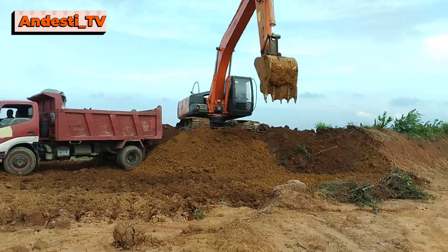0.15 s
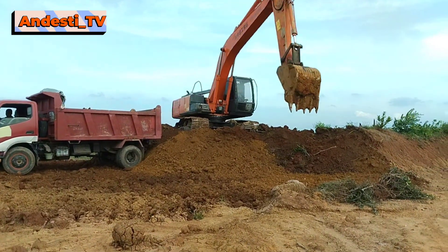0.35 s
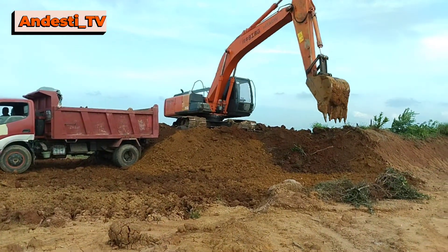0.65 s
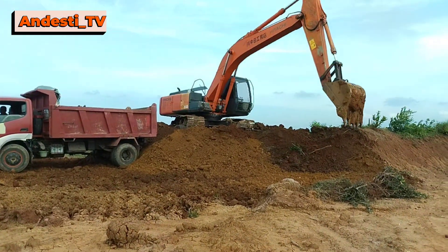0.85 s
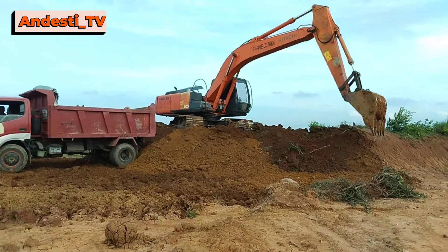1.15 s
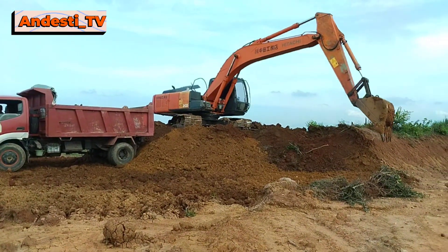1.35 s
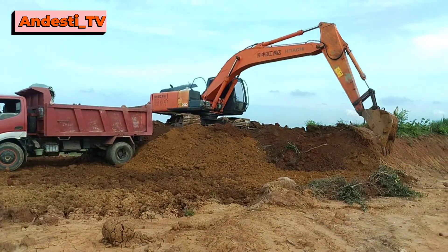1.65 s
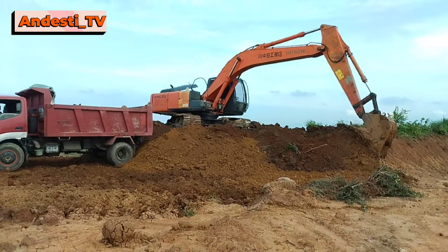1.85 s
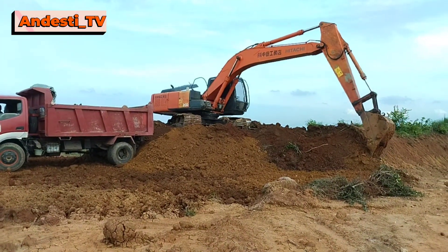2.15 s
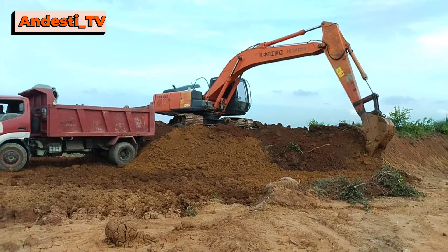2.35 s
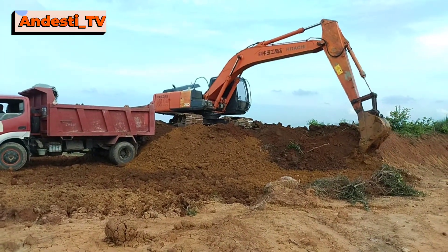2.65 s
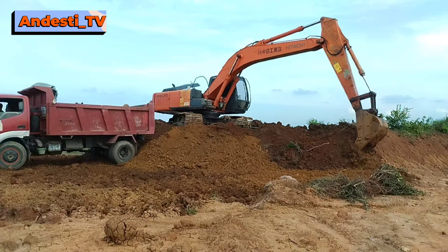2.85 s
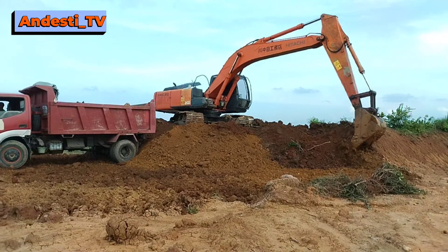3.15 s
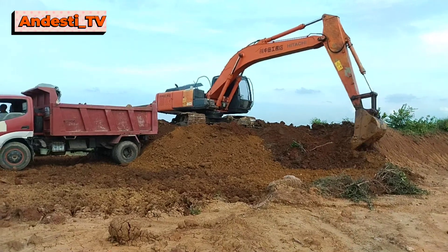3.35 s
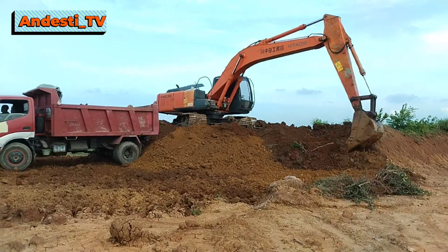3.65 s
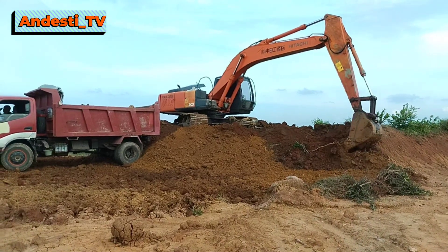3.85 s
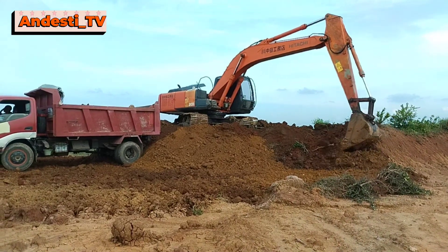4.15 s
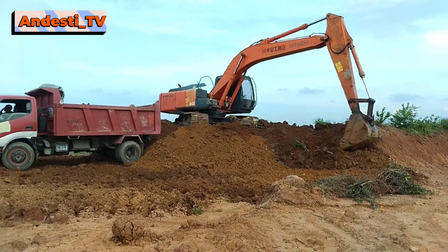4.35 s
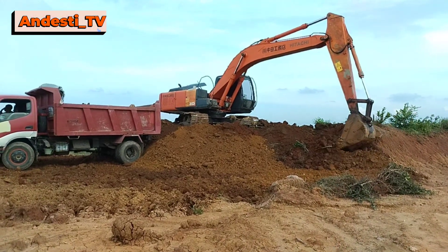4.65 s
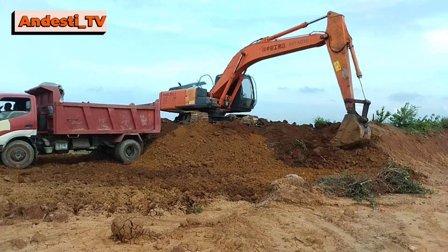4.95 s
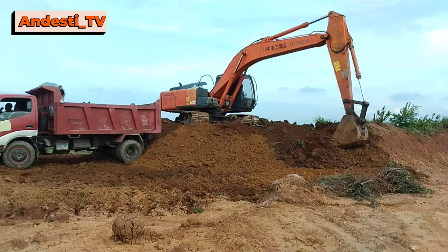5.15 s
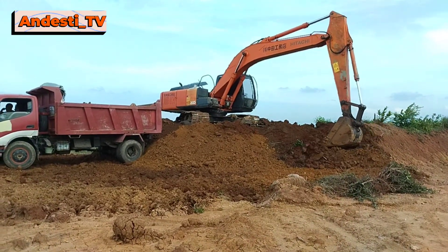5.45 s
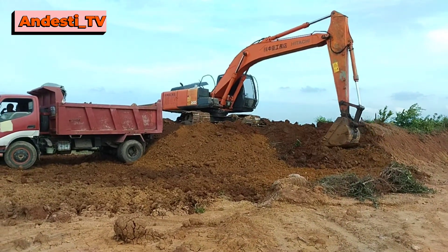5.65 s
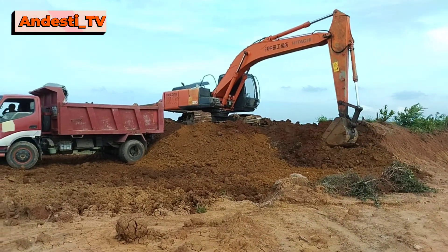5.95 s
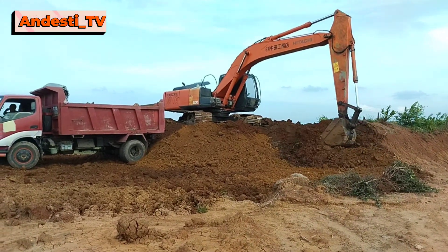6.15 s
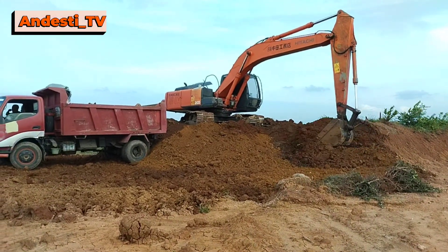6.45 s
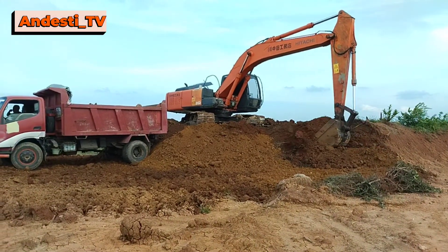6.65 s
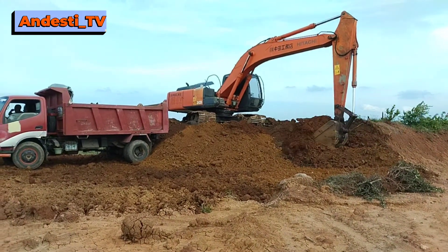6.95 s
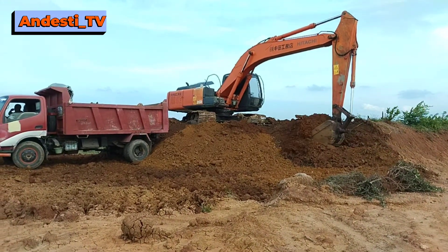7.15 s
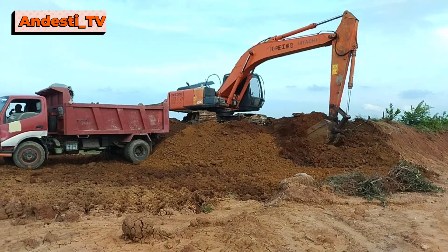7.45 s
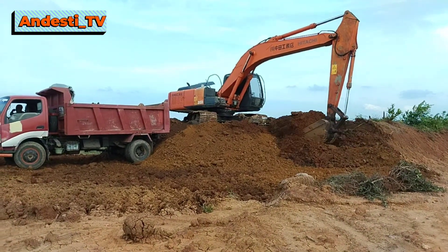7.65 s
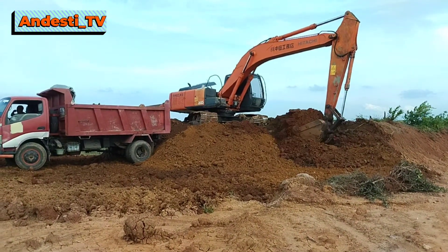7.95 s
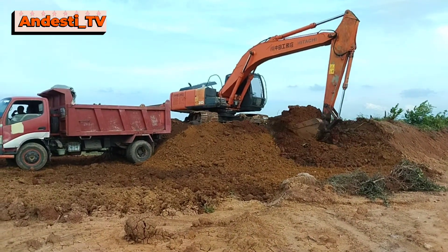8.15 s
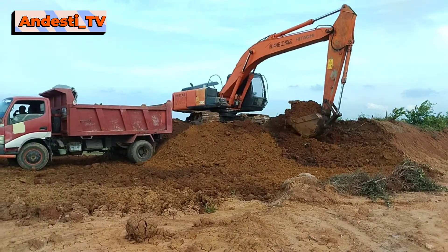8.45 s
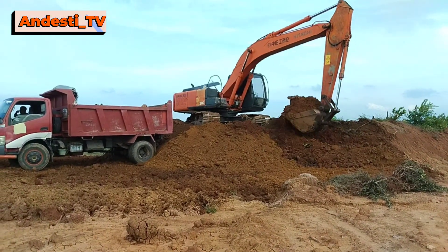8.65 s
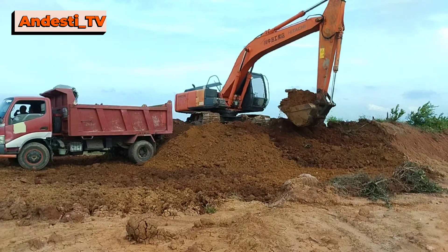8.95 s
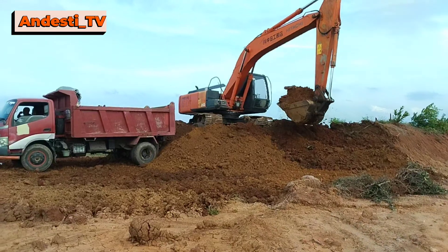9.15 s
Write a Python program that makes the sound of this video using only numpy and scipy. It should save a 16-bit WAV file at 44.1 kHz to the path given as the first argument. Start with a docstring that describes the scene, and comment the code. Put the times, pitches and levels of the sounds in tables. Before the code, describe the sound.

A diesel excavator works some way off in the open air beside an idling dump truck. Its exhaust hums and swells with the load under a thin, fluttering turbocharger whistle. Dry soil rustles and the steel arm creaks at first, then comes one sharp metallic scrape and a few small ticks. Faint soil rustles return later. Wind buffets the microphone in gusts, hardest in the first three seconds, over a constant low rumble.

```python
"""An earth bank in open air, some way from the microphone: a diesel excavator swings round and digs
beside an idling dump truck. Its exhaust hums and its turbocharger whistles with the load; soil rustles,
and there is one sharp metallic scrape and a few ticks. Gusts rise, hold and die away over a light
breeze, buffet the microphone and drive the recorder into its limiter."""
import sys
import numpy as np
from scipy import signal
from scipy.fft import rfft, irfft
from scipy.io import wavfile
from scipy.ndimage import uniform_filter1d, minimum_filter1d

SR = 44100
rng = np.random.default_rng(int(sys.argv[2]) if len(sys.argv) > 2 else 0)


def dump(signal):
    """Clip the signal to [-1, 1] and save it as 16-bit WAV at the path in sys.argv[1]."""
    limited = np.clip(np.atleast_2d(signal).T, -1, 1)
    pcm = np.round(limited * 32767).astype(np.int16)
    wavfile.write(sys.argv[1], SR, pcm)


N = 410571
TIME = np.arange(N) / SR

# gusts at the microphone: t/s, hold/s, level/dB
GUSTS = [(0, .05, -9.5), (.08, 0.056, -16.5), (.4, 0.14, -17), (.565, 0.18, -5.5), (.82, 0.084, -6.5),
         (.91, 0.054, -11.5), (1.01, 0.079, -3.5), (1.13, 0.11, -9), (1.26, 0.23, -6.5), (1.51, .16, -7),
         (1.72, .13, -8), (1.9, 0.37, -10), (2.3, .025, -9), (2.5, 0.077, -7.5), (2.63, 0.21, -8.5),
         (2.89, .065, -5), (3.465, 0.032, -8.5), (3.695, 0.022, -16.5), (3.975, 0.017, -13.5),
         (4.52, .05, -5), (4.64, .045, -5), (4.735, 0.021, -6.5), (4.98, 0.29, -12.5), (5.1, 0.072, -7),
         (5.415, 0.093, -9), (5.555, 0.013, -9.5), (5.685, 0.055, -9), (6.91, 0.014, -18.5),
         (7.255, .03, -12), (7.59, 0.016, -13.5), (7.815, 0.039, -11.5), (7.9, 0.15, -16.5),
         (8.22, 0.074, -11), (8.36, 0.043, -11.5), (8.485, .09, -11.5), (8.64, 0.093, -17.5),
         (8.95, .075, -15.5), (9.25, .06, -17.5)]
GUST_ATTACK_S, GUST_RELEASE_S = 0.024, 0.025


def exhaust(firings):
    """The excavator's pipe hums and swells with load, with a whine at ten times the firing rate."""
    # exhaust note under load: t/s, level/dB
    load = [(0, -27), (2.3, -22), (3.0, -20.5), (3.8, -17), (4.3, -25), (5.9, -25.5), (6.3, -29.5),
            (6.7, -25.5), (7.6, -25), (8.3, -40), (9.3, -28)]
    # lines of the hum: multiple of the firing rate, relative level/dB
    harmonics = [(1, -13.5), (2, -2.5), (3, -39), (4, -30), (6, -24.5), (8, -45), (17, -39)]
    hum = 0
    for k, db in harmonics:
        level = undb(db + 2 * walk(10))
        hum += level * np.sin(2 * np.pi * round(k) * firings + 0.12 * walk(13) + random_phase())
    whine = np.sin(2 * np.pi * 10 * firings) * undb(-31.5 + 2 * walk(7.7))
    hum_db, whine_share = curve(load), 0.44
    return hum * undb(hum_db) + whine * undb(whine_share * hum_db)


def engine_block(firings):
    """Combustion clatter swells at each firing over the steady rush of fan and intake."""
    # clatter of the block: f/Hz, spectral density/dB
    block_colour = [(150, 9.5), (260, -6), (380, -2), (640, -2.5), (870, 4), (1110, -15), (1260, -0.5),
                    (1480, 2), (1670, -5), (1860, 0.5), (2070, -10), (2600, -1), (3450, -13.5), (4200, -26)]
    # air rushing through the intake: f/Hz, spectral density/dB
    intake_colour = [(3000, -22), (4300, -8.5), (5500, -4.5), (6800, -3.5), (7600, 0.5), (8500, 2),
                     (9450, 3), (10100, -5.5), (12000, -7), (13500, -16), (15500, -19)]
    # block, fan and pumps together: t/s, gain/dB
    machine_gain = [(0, -3.5), (2.2, 1.5), (3.5, 0.5), (5.5, 0), (8.2, 0), (9.3, -1)]
    beat = 1 + 0.17 * np.cos(2 * np.pi * firings)
    clatter = unit(noise(block_colour) * beat) * undb(-35.5 + 0.91 * walk(25))
    intake = noise(intake_colour) * undb(-42.5 + 0.69 * walk(12))
    return (clatter + intake) * undb(curve(machine_gain))


def turbocharger():
    """The blade tone flutters, splitting into side lines that swell and fade inside a narrow hiss."""
    # pitch of the whistle: t/s, f/Hz
    pitch = [(0, 8190), (.55, 8210), (.95, 8230), (1.55, 8300), (2.0, 8050), (2.6, 7700), (3.0, 7940),
             (3.75, 8030), (5.0, 7900), (6.8, 7840), (7.3, 8000), (7.7, 7880), (8.4, 8040), (9.3, 8010)]
    # strength of the whistle: t/s, level/dB
    whistle_level = [(0, -39.5), (1.7, -42), (3.1, -36.5), (4.95, -37), (5.5, -40), (6.5, -38.5),
                     (6.7, -33.5), (7.3, -34.5), (7.7, -37), (8.1, -35), (8.7, -41.5), (9.3, -36)]
    flutter_hz = 73.7
    blade = 2 * np.pi * np.cumsum(curve(pitch) + 3.8 * walk(17)) / SR
    flutter = 2 * np.pi * np.cumsum(flutter_hz + 0.61 * walk(4.5)) / SR
    tone = 0
    for k in range(-4, 5):
        level = undb(-4.6 * abs(k - .1) + 2.2 * walk(3.9))
        tone += level * np.sin(blade + k * flutter + 0.46 * walk(25) + random_phase())
    hiss = walk(420) * np.sin(blade) + walk(420) * np.cos(blade)
    return even(tone + undb(-5.5) * hiss, 0.136) * undb(curve(whistle_level) + 2.23 * walk(24))


def digging():
    """Dry, grainy soil rustles in bursts, with a few rasping creaks that ring the steel arm."""
    # bursts of rustling: t/s, hold/s, level/dB
    bursts = [(.05, 0.69, -33.5), (.38, 0.12, -34), (.82, 0.082, -31.5), (.99, 0.063, -29),
              (1.15, 0.65, -44), (6.38, .08, -43), (7.98, 0.21, -39.5)]
    # dry soil: f/Hz, spectral density/dB
    soil_colour = [(500, 4), (850, 4), (1100, -2), (2100, -2.5), (2800, -2.5), (4000, -15.5), (6000, -11.5),
                   (9000, -3.5), (10500, -14), (11900, -12), (13200, -25), (15500, -19)]
    # creaks: t/s, level/dB, length/s, centre/Hz, width/Hz
    creaks = [(0.225, -32.5, 0.039, 1060, 1500), (0.395, -30.5, 0.067, 2100, 900),
              (0.795, -32.5, 0.11, 2650, 1090)]
    # modes of the arm: f/Hz, width/Hz, spectral density/dB
    arm_modes = [(829, 47, 0), (1600, 92, -8), (1836, 95, -5), (2200, 93, -6), (2680, 160, -9),
                 (3000, 120, -13)]
    grains = unit(noise(soil_colour) * undb(0.98 * walk(300) + 1.8 * walk(35)))
    out = grains * swells(bursts, attack=0.04, release=0.05)
    for s, db, length, hz, width_hz in creaks:
        size = int(length * SR)
        ring = unit(sum(undb(mode_db) * np.sqrt(width) * band(f, width, size)
                        for f, width, mode_db in arm_modes))
        rasp = band(hz, width_hz, size)
        out[int(s * SR):][:size] += undb(db) * np.sqrt(np.hanning(size)) * (rasp + ring)
    return out


def scrape():
    """Metal scrapes and snaps free: each slip is a burst of grit that rings it unevenly."""
    # slips: t/s, level/dB, attack/s, t60/s, centre/Hz, width/Hz, relative ring level/dB
    slips = [(2.325, -24, 0.0052, 0.17, 7440, 6000, 12), (2.328, -20.5, 0.0044, 0.42, 1050, 1340, -17),
             (2.331, -14.5, 0.004, 0.23, 2610, 1110, -12), (2.341, -13.5, 0.0027, 0.13, 8100, 3520, 0.5),
             (2.36, -2, 0.0018, 0.09, 6830, 1920, -12), (2.372, -13, 0.0026, 0.12, 6300, 2010, 0.5)]
    # modes of the scraped metal: f/Hz, level/dB, t60/s
    metal_modes = [(2897, -5.5, .11), (4746, -3.5, .085), (6230, -10, .12), (6570, -12, .12),
                   (7750, -4, .08), (8268, -4, .12), (9408, -8, .1), (11350, -16, .08)]
    out, t = np.zeros(N), TIME[:SR // 2]
    for s, db, attack, t60, hz, width_hz, ring_db in slips:
        ring = 0
        for f, mode_db, ring_t60 in metal_modes:
            phase = 2 * np.pi * f * t + random_phase()
            rubbing = .5 * band(190, 360, len(t))  # the contact keeps shaking the mode's phase
            ring += undb(mode_db) * fade(t, ring_t60) * np.sin(phase + rubbing)
        grit = band(hz, width_hz, len(t)) + undb(-19) * band(4000, 11000, len(t))
        slip = grit * fade(t, t60) + undb(ring_db) * ring
        out[int(s * SR):][:len(t)] += undb(db) * np.minimum(t / attack, 1) * slip
    return out


def ticks():
    """Small, bright ticks: bare bursts of noise that die quickly."""
    # ticks: t/s, level/dB, t60/s, centre/Hz, width/Hz
    bursts = [(.66, -30, .04, 4000, 5000), (.868, -27.5, 0.059, 7500, 6000), (1.766, -38, 0.12, 5500, 500),
              (3.229, -11.5, 0.0065, 8750, 4400), (3.445, -14.5, 0.0058, 8500, 4130),
              (5.215, -30, 0.069, 8860, 5980), (5.575, -31, .015, 11940, 3894),
              (7.125, -29, 0.085, 8800, 3450)]
    out, t = np.zeros(N), TIME[:SR // 2]
    for s, db, t60, hz, width_hz in bursts:
        out[int(s * SR):][:len(t)] += undb(db) * fade(t, t60) * band(hz, width_hz, len(t))
    return out


def truck():
    """Beside the excavator the idling truck ticks evenly, each tick with a lower diesel knock."""
    cycles = np.cumsum(23.2 + 0.2 * walk(1.84)) / SR
    pulse = uniform_filter1d(np.exp(-(cycles % 1) / 0.31), SR // 200) * undb(walk(23))
    return pulse * (undb(-43.5) * band(5960, 1130) + undb(-39.5) * band(2450, 1100))


def wind():
    """Eddies buffet the microphone over a deep rumble; stronger gusts bring smaller, brighter ones."""
    # rumble of the breeze: t/s, level/dB
    breeze_level = [(0, -18), (1.3, -25.5), (2.1, -18), (3.2, -22.5), (4.4, -26), (4.6, -16), (4.85, -17.5),
                    (5.75, -18.5), (6.1, -26.5), (6.6, -18.5), (6.85, -28), (8.2, -18), (9.3, -25)]
    # buffeting in a strong gust: f/Hz, spectral density/dB
    gust_colour = [(50, 1), (90, -0.5), (140, 2), (200, -2), (300, -11), (500, -17.5), (800, -32.5),
                   (1300, -74), (2500, -42)]
    # deep rumble: f/Hz, spectral density/dB
    rumble_colour = [(10, -3), (22, 2.5), (45, -3.5), (75, -3), (105, -9), (160, -31), (300, -41)]
    gusts, breeze = swells(GUSTS, GUST_ATTACK_S, GUST_RELEASE_S), undb(curve(breeze_level))
    buffet_db = 20 * np.log10(np.hypot(gusts, breeze * undb(-5.5 + 3.1 * walk(22))))
    brightness_db = np.minimum(buffet_db + 3.0, 0) + 2.1 * walk(70)
    centres = 60 * 2 ** np.arange(0, 5.5, .5)
    weights = undb(colour_db(gust_colour, centres)) * np.sqrt(centres)
    buffet = 0
    for hz, weight in zip(centres, weights):
        octaves_up = np.clip(np.log2(hz / 150), 0, 2.5)
        buffet += weight * band(hz, hz * 0.47) * undb(0.65 * octaves_up * brightness_db)
    surge = undb(-14) * uniform_filter1d(gusts ** 0.36, int(0.041 * SR))  # gusts swell the rumble too
    rumble = even(noise(rumble_colour), 0.156) * np.hypot(breeze, surge) * undb(2.26 * walk(20))
    return even(buffet, 0.0391) * undb(buffet_db + 2.43 * walk(60)) + rumble


def wind_slaps():
    """A lone eddy hits the microphone port with a quick, dull puff; smaller ones pepper the gusts."""
    # the hardest slaps: t/s, relative peak/dB
    slaps = [(0.576, -4.5), (0.659, -1), (0.7, -1), (0.78, -7), (0.87, -5), (1.008, -15), (1.064, 2.5),
             (1.188, -2), (1.268, -5), (1.287, 1), (1.342, -9), (1.401, -6), (1.6, -2.5), (1.722, -7),
             (1.91, -10), (2.016, -14), (2.238, -15), (2.63, -8), (2.886, -7), (2.92, -8), (4.512, -3.5),
             (4.556, -2), (4.633, -2.5), (4.669, -10), (4.732, -2), (5.72, -9.5), (8.368, -11)]
    # puff at the port: f/Hz, spectral density/dB
    slap_colour = [(90, -3), (200, 10), (350, 8.5), (600, 1.5), (1200, -14.5), (2000, -30.5), (4000, -45)]
    rise_s, crackles_per_s = 0.0031, 130
    age = np.arange(SR // 5) / SR / rise_s
    puff = age * np.exp(1 - age)
    force = np.zeros(N)
    for s, db in slaps:
        force[int(s * SR):][:len(puff)] += undb(db - 4.5) * puff
    gusts = swells(GUSTS, GUST_ATTACK_S, GUST_RELEASE_S)
    eddies = (rng.random(N) < crackles_per_s / SR) * gusts ** 1.89
    force += undb(-12.5) * signal.fftconvolve(eddies, puff)[:N]
    return force * even(noise(slap_colour), 0.0048)


def undb(db):
    """Decibels to gain."""
    return 10 ** (np.asarray(db) / 20)


def curve(rows):
    """Rows (t/s, value) joined by straight lines."""
    return np.interp(TIME, *np.transpose(rows))


def unit(x):
    """Scale to rms 1."""
    return x / np.sqrt(np.mean(x ** 2))


def random_phase():
    """A starting phase in radians."""
    return rng.uniform(0, 2 * np.pi)


def colour_db(points, hz):
    """A spectrum read on a log-frequency axis, falling 36 dB an octave past its ends."""
    f, db = np.transpose(points)
    octave, known = np.log2(np.maximum(hz, 1)), np.log2(f)
    return np.interp(octave, known, db) - 36 * np.abs(octave - np.clip(octave, known[0], known[-1]))


def noise(points):
    """Noise of a given spectrum, rms 1."""
    gains = undb(colour_db(points, np.fft.rfftfreq(N, 1 / SR)))
    return unit(irfft(rfft(rng.standard_normal(N)) * gains, N))


def band(hz, width_hz, size=N):
    """Noise through a resonance applied twice, rms 1."""
    b, a = signal.iirpeak(min(hz, .45 * SR), hz / width_hz, SR)
    return unit(signal.lfilter(b, a, signal.lfilter(b, a, rng.standard_normal(size))))


def walk(rate):
    """Random levels held 1 / rate s and smoothed twice, rms 1."""
    hold = int(SR / rate)
    steps = np.repeat(rng.standard_normal(N // hold + 1), hold)
    return unit(uniform_filter1d(uniform_filter1d(steps, hold), hold)[:N])


def even(x, seconds):
    """Take the slow swells out of a signal."""
    return x / np.sqrt(uniform_filter1d(x ** 2, int(seconds * SR)) + 1e-9)


def fade(t, t60):
    """A decay of 60 dB in t60 seconds."""
    return np.exp(-np.log(1000) * t / t60)


def swells(rows, attack, release):
    """Each row (t/s, hold/s, level/dB) rises up to t, holds and dies away; overlaps add in power."""
    power = 0
    for s, hold, db in rows:
        rise = np.clip(1 + (TIME - s) / attack, 0, 1) ** 2
        fall = np.exp(-np.clip((TIME - s - hold) / release, 0, 20))
        power += (undb(db) * rise * fall) ** 2
    return np.sqrt(power)


def scene():
    """Both machines some way off and the wind right at the microphone, in mono."""
    # firing rate of the excavator's engine: t/s, f/Hz
    firing_rate = [(0, 82.6), (.6, 87.2), (1.3, 84.6), (2.3, 85.64), (2.9, 91), (3.25, 89.54), (3.95, 87.9),
                   (4.4, 84.15), (5.5, 83.54), (6.25, 81.4), (6.6, 84.1), (7.6, 84.03), (8.1, 85.54),
                   (9.3, 86.7)]
    firings = np.cumsum(curve(firing_rate) * (1 + 0.000925 * walk(11))) / SR
    engines = exhaust(firings) + engine_block(firings) + turbocharger() + truck()
    return (engines + digging() + scrape() + ticks() + wind() + wind_slaps())[None]


def record(dry):
    """The recorder's limiter ducks everything in the hardest gusts, and remaining peaks are flattened."""
    threshold, ceiling, top_hz = 1.2, 0.9, 15550
    hold, attack = int(0.027 * SR), int(0.014 * SR)
    allowed = np.minimum(1, threshold / (np.abs(dry[0]) + 1e-9))
    # each overload holds the gain down for a moment afterwards
    held = minimum_filter1d(allowed, hold, origin=(hold - 1) // 2)
    ducked = dry * uniform_filter1d(held, attack)
    flattened = ducked / (1 + (ducked / ceiling) ** 8) ** (1 / 8)
    return signal.sosfilt(signal.ellip(10, .2, 80, top_hz, fs=SR, output="sos"), flattened)


dry = scene()
out = record(dry)
dump(out)
```